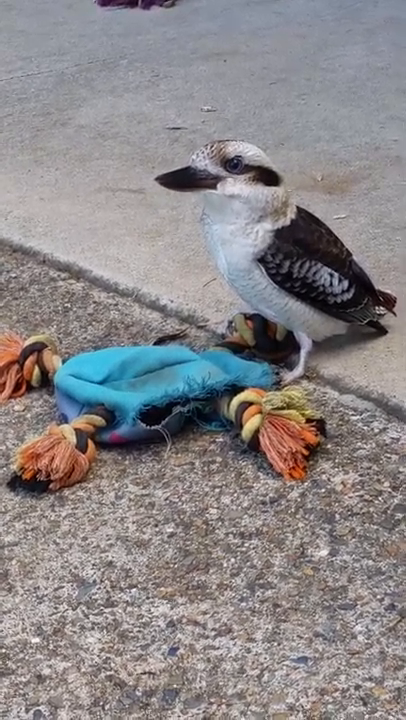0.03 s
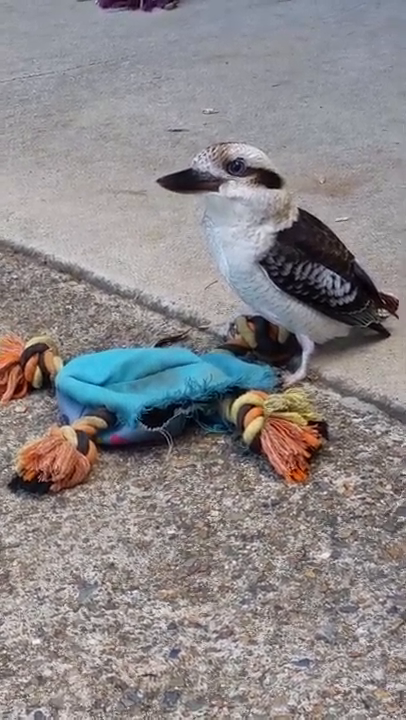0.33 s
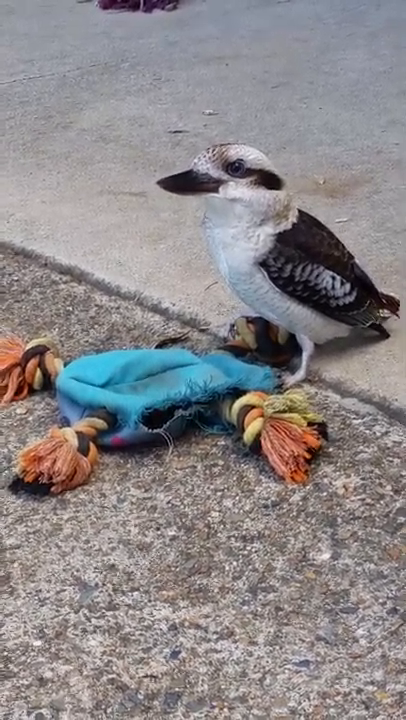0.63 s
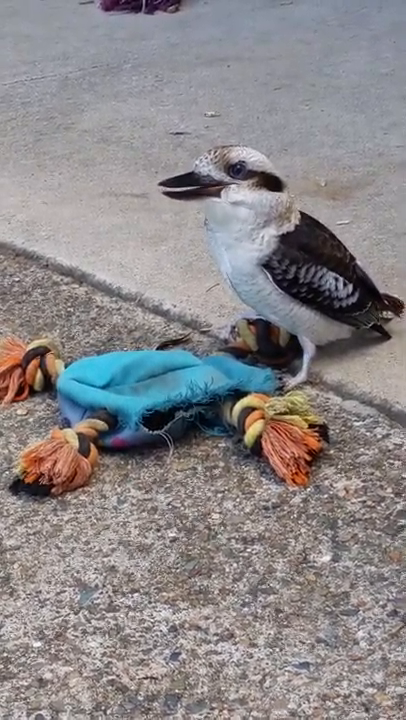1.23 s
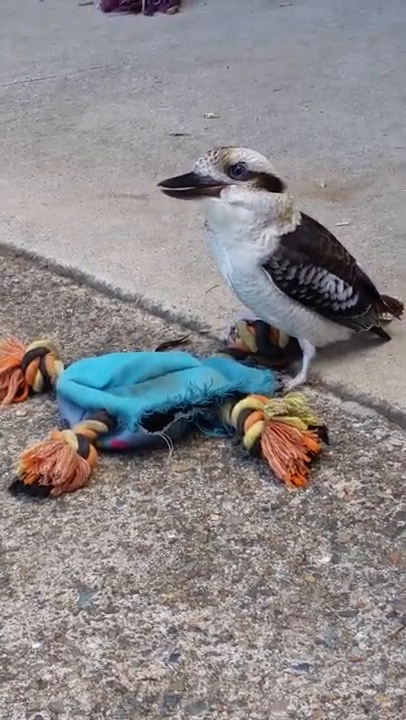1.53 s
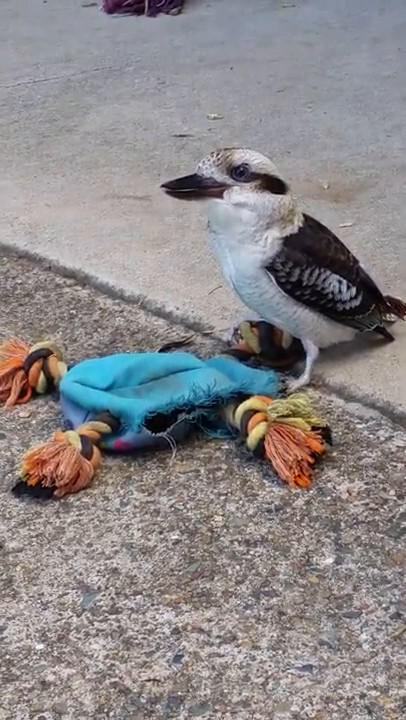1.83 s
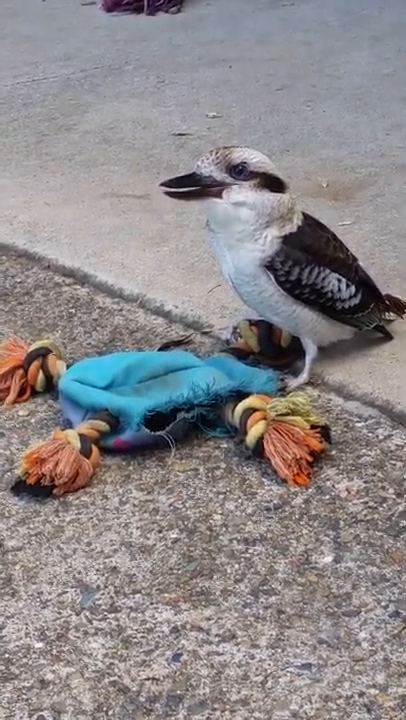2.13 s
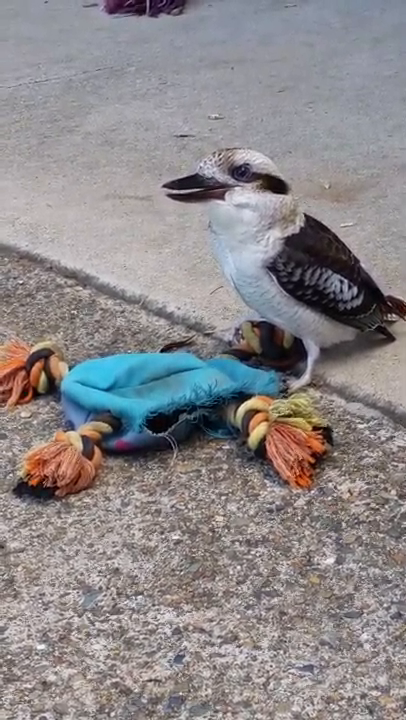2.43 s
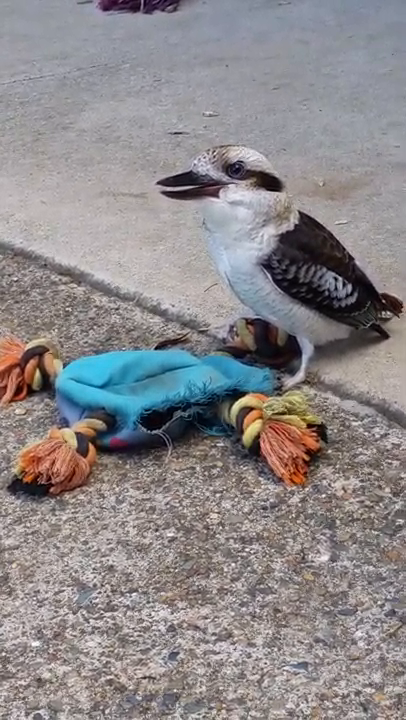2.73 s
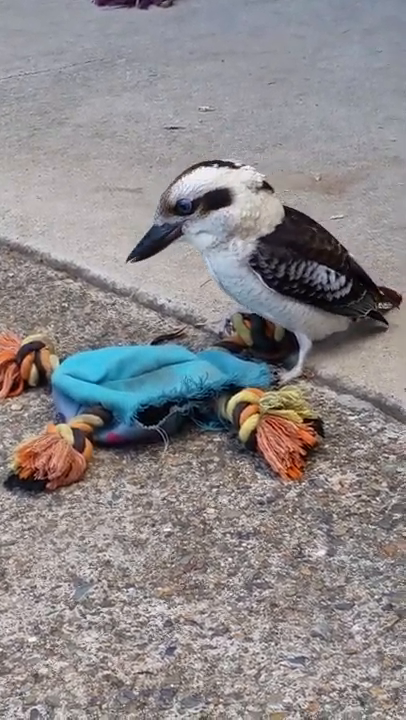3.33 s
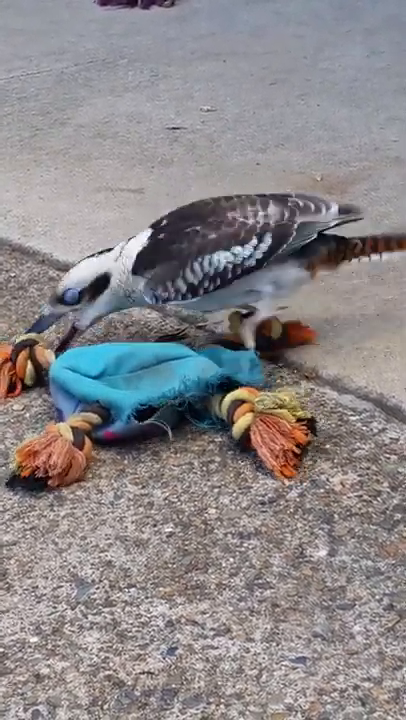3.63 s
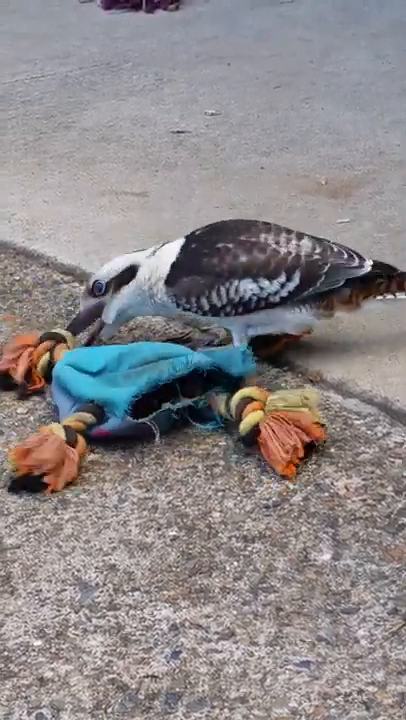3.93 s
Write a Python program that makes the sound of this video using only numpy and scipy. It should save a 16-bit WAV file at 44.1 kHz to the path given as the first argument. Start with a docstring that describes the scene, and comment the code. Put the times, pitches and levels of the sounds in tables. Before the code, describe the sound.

Close by on a concrete patio, a young bird begs in harsh, pulsing rasps after a hollow bump. It ends with a brief squawk and taps twice at a toy, over faint rumble and distant machine hum.

```python
"""A young kookaburra begs on a concrete patio, over rumble, hiss and a far machine hum.
A hollow bump and a rustle come first. A thin whine rises and at 1.2 s breaks into squeaks and dry,
rasping chatter; each rasp is a train of click bursts from the syrinx. Three more bumps sound near 2 s.
At 3 s comes a muffled rattle with the beak shut, then one short squawk.
Last, the bird taps twice as it lunges at a toy."""
import sys
import numpy as np
from scipy import signal
from scipy.fft import rfft, irfft
from scipy.io import wavfile
from scipy.ndimage import uniform_filter1d, map_coordinates

SR = 44100
rng = np.random.default_rng(int(sys.argv[2]) if len(sys.argv) > 2 else 0)


def int16_out(signal):
    """Quantize to a 16-bit WAV file."""
    q = np.round(np.clip(np.atleast_2d(signal).T, -1, 1) * 32767)
    wavfile.write(sys.argv[1], SR, q.astype(np.int16))


N = 176400
T = np.arange(N) / SR
BIN_HZ = np.fft.rfftfreq(N, 1 / SR)


def amp(db):
    """Decibels to gain."""
    return 10 ** (np.asarray(db) / 20)


def unit_rms(x):
    """Scales to rms 1."""
    return x / np.sqrt(np.mean(x ** 2) + 1e-20)


def lookup(points, hz):
    """Interpolates (frequency, value) points on a log-frequency axis."""
    point_hz, value = np.transpose(points)
    return np.interp(np.log(hz + 1), np.log(point_hz + 1), value)


def add(mix, start_s, sound):
    """Mixes a sound in at start_s."""
    part = mix[max(round(start_s * SR), 0):][:len(sound)]
    part += sound[:len(part)]


def noise(colour):
    """Steady noise with the given spectrum, rms 1."""
    return unit_rms(irfft(rfft(rng.standard_normal(N)) * amp(lookup(colour, BIN_HZ)), N))


def drift(corner_hz):
    """Low-passed random motion, rms 1."""
    return unit_rms(irfft(rfft(rng.standard_normal(N)) / (1 + (BIN_HZ / corner_hz) ** 2) ** 2, N))


def ring(colour, size=2048):
    """Minimum-phase impulse response of a spectrum, energy 1."""
    db = np.maximum(lookup(colour, abs(np.fft.fftfreq(size, 1 / SR))), -70)
    log_spectrum = np.conj(signal.hilbert(np.log(amp(db))))
    response = np.fft.ifft(np.exp(log_spectrum)).real[:size // 2]
    return response / np.linalg.norm(response)


def puff(decay_s, size=1024):
    """Decaying noise burst, energy 1."""
    burst = rng.standard_normal(size) * np.exp(-np.arange(size) / SR / decay_s)
    return burst / np.linalg.norm(burst)


def machine_hum():
    """Distant machine: low partials, each wavering in level and pitch."""
    # (frequency [Hz], rms level [dB])
    partials = [(72.7, -54.5), (121, -60), (145.6, -52.5), (217, -61.5), (291, -66), (436, -72.5)]
    drift_hz = 7.06
    out = np.zeros(N)
    for hz, db in partials:
        flutter = 1 + 0.1473 * drift(drift_hz)
        pitch_hz = hz * (1 + 0.01167 * drift(drift_hz))
        out += np.sqrt(2) * amp(db) * flutter * np.sin(2 * np.pi * np.cumsum(pitch_hz) / SR)
    return out


def background(right_share):
    """Swelling rumble, hum and hiss; right_share scales the right channel's colouring in dB."""
    # rumble spectrum (frequency [Hz], relative density [dB])
    rumble_colour = [(12, -78.5), (20, -23.5), (38, -6.5), (75, -3), (113, -3), (146, 2), (177, -8.5),
                     (290, -10.5), (340, -13.5), (430, -18.5), (2200, -39.5), (2860, -71.5), (4840, -120)]
    # hiss spectrum (frequency [Hz], relative density [dB])
    hiss_colour = [(900, -0.5), (2300, -28), (2700, -5.5), (3000, 3.5), (3400, -11), (4000, -9),
                   (4400, -3.5), (4800, -21.5), (5500, -20), (6600, -4.5), (7600, -19), (9000, -31),
                   (11000, -27.5), (12800, -11), (14500, -19.5), (15800, -16)]
    # slow swell (time [s], rumble and hum gain [dB], hiss gain [dB])
    swell = [(0, -6.5, -9), (.29, -5, -8.5), (.39, -2, -3), (.56, -7, -8.5), (.75, -4, -9.5),
             (1.45, -1.5, -1), (1.85, -2.5, -2.5), (2.05, 2.5, 0.5), (2.55, 0.5, 4), (3.0, -0.5, 1.5),
             (3.551, 3, 0.5), (3.78, 1, 0.5), (4, 0, -3)]
    # right channel colouring (frequency [Hz], gain [dB])
    right_colour = [(25, 0.5), (70, -12), (150, -18.5), (300, -11), (700, -8), (2000, -4.5), (3000, -8.5),
                    (7000, -11.5), (13000, -7)]
    time_s, low_db, hiss_db = np.transpose(swell)
    low = (machine_hum() + amp(-49.5) * noise(rumble_colour)) * amp(np.interp(T, time_s, low_db))
    hiss = amp(-61.5 + np.interp(T, time_s, hiss_db)) * noise(hiss_colour)
    return irfft(rfft(low + hiss) * amp(right_share * lookup(right_colour, BIN_HZ)), N)


def patio(sound):
    """Diffuse tail from the surrounding walls; the bass lasts longest."""
    # reverberation (frequency [Hz], T60 [s])
    decay = [(300, 0.9), (1200, 0.654), (3000, 0.1484), (8000, 0.344)]
    hz, t, spectra = signal.stft(rng.standard_normal(SR), SR, nperseg=256)
    fade = amp(-60 * t / lookup(decay, hz)[:, None])
    tail = signal.istft(spectra * fade, SR, nperseg=256)[1]
    return signal.fftconvolve(sound, tail / np.linalg.norm(tail))[:N]


def bumps():
    """Hollow bumps nearby, each one low note cut short; dull contacts start the first."""
    # hollow notes (start [s], rise [s], length [s], pitch [Hz], level [dB])
    notes = [(0.317, 0.0247, 0.0614, 236.7, -30), (1.977, 0.00324, 0.0225, 335.8, -35.5),
             (2.006, 0.0049, 0.0174, 336.4, -34), (2.041, 0.0149, 0.0145, 307.2, -36)]
    # contacts (time [s], level [dB])
    contacts = [(0.322, -33.5), (.336, -23.5)]
    # contact spectrum (frequency [Hz], relative gain [dB])
    contact_colour = [(100, -11.5), (380, 10), (600, -9), (1200, -24.5), (2000, -24.5), (4000, -41.5)]
    t60_s, release_s, octave_db = 0.193, 0.00436, -27.5
    out = np.zeros(N)
    for start_s, rise_s, length_s, hz, db in notes:
        t = np.arange(0, length_s + release_s / 2, 1 / SR)
        envelope = np.minimum(t / rise_s, amp(-60 * (t - rise_s) / t60_s))
        release = np.minimum((t[-1] - t) / release_s, 1)
        phase = 2 * np.pi * hz * t
        tone = np.sin(phase) + amp(octave_db) * np.sin(2 * phase)
        add(out, start_s, amp(db) * envelope * release * tone)
    for time_s, db in contacts:
        add(out, time_s, amp(db) * ring(contact_colour))
    return out


def rustles():
    """Soft rustles: brief arches of coloured noise."""
    # rustles (start [s], length [s], level [dB])
    events = [(0.319, 0.151, -60.5), (3.703, 0.139, -63)]
    # rustle spectrum (frequency [Hz], relative density [dB])
    colour = [(150, 0.5), (420, 14.5), (800, -7), (1150, -0.5), (1500, -27), (2000, -1.5), (3000, -11),
              (5000, -22), (6500, -2.5), (9000, -42.5)]
    out, rustle = np.zeros(N), noise(colour)
    for start_s, length_s, db in events:
        progress = np.clip((T - start_s) / length_s, 0, 1)
        out += amp(db) * rustle * np.sqrt(abs(np.sin(np.pi * progress)))
    return out


def taps():
    """Dry taps on the ground: an impact plus a short scuff."""
    # impacts (time [s], level [dB])
    hits = [(3.722, -27.5), (3.8432, -28.5)]
    # impact spectrum (frequency [Hz], relative gain [dB])
    colour = [(150, -16.5), (450, 10), (900, 3.5), (1400, -1), (2200, -19.5), (6000, -39.5)]
    out, impact = np.zeros(N), ring(colour)
    for time_s, db in hits:
        scuff = signal.fftconvolve(puff(decay_s=0.00357), impact)
        add(out, time_s, amp(db) * impact)
        add(out, time_s, amp(db + 1.5) * scuff)
    return out


def beak_tick(time_s=3.014, db=-44.5):
    """One thin, high tick of the beak."""
    # tick spectrum (frequency [Hz], relative gain [dB])
    colour = [(5000, -41), (9000, -24), (10500, -0.5), (12500, 1.5), (14000, -24.5)]
    out = np.zeros(N)
    add(out, time_s, amp(db) * signal.fftconvolve(puff(decay_s=0.0034), ring(colour)))
    return out


def whine():
    """Thin rising tone; its octave gains as it gets louder."""
    # whine contour (time [s], pitch [Hz], level [dB])
    contour = [(.73, 1497, -85.5), (.79, 1552, -76), (.85, 1600, -82), (0.884, 1868, -69.5),
               (0.979, 1937, -62), (1.08, 1970, -59.5), (1.138, 2089, -54.5), (1.175, 2137, -47.5),
               (1.195, 2071, -54.5), (1.21, 2060, -95)]
    time_s, hz, db = np.transpose(contour)
    pitch_hz = np.interp(T, time_s, hz) * (1 + 0.00505 * drift(corner_hz=90))
    phase = 2 * np.pi * np.cumsum(pitch_hz) / SR
    envelope = amp(np.interp(T, time_s, db)) * (T > time_s[0]) * (T < time_s[-1])
    octave = amp(-13) * envelope / envelope.max() * np.sin(2 * phase)
    return envelope * (np.sin(phase) + octave)


def squeaks():
    """Short rough tones that glide, mostly upward, and level off."""
    # squeaks (start [s], length [s], first pitch [Hz], last pitch [Hz], level [dB])
    glides = [(1.236, .014, 2200, 2350, -49), (1.40, .042, 3150, 3550, -54), (1.642, .01, 2200, 2100, -56),
              (1.652, .03, 1600, 1950, -59), (1.736, .037, 2100, 2830, -55), (1.811, .04, 2350, 3020, -49),
              (2.98, .029, 1500, 1950, -47)]
    roughness_hz = 400
    waver = 1 + 0.025 * drift(roughness_hz)
    flutter = 1 + 0.55 * drift(roughness_hz)
    out = np.zeros(N)
    for start_s, length_s, first_hz, last_hz, db in glides:
        progress = np.linspace(0, 1, round(length_s * SR))
        span = round(start_s * SR) + np.arange(len(progress))
        pitch_hz = (last_hz + (first_hz - last_hz) * (1 - progress) ** 2) * waver[span]
        envelope = amp(db) * np.sqrt(abs(np.sin(np.pi * progress))) * flutter[span]
        add(out, start_s, envelope * np.sin(2 * np.pi * np.cumsum(pitch_hz) / SR))
    return out


def swept(click, delay_s_per_hz=1.7e-7):
    """Makes a click a tiny upward sweep: treble arrives just after the low ring."""
    hz = np.fft.rfftfreq(len(click), 1 / SR)
    return irfft(rfft(click) * np.exp(-1j * np.pi * delay_s_per_hz * hz ** 2), len(click))


def syrinx_click(throat, tuning):
    """Air leak, pulse and puff ring the throat. Returns the click (energy 1) and its lead [s]."""
    retuned = map_coordinates(throat, [np.arange(len(throat)) * tuning], order=3)
    leak = amp(-8) * puff(decay_s=0.00094)[::-1]
    after_puff = amp(-8) * puff(decay_s=0.0017)
    click = signal.fftconvolve(retuned, np.concatenate([leak, [1], after_puff]))
    power = abs(uniform_filter1d(uniform_filter1d(click ** 2, size=16), size=16))
    click /= np.sqrt(1 + 1.3 * power / power.max())  # flatter peak, fuller click
    return click / np.linalg.norm(click), len(leak) / SR


def chatter():
    """Rasps, rattle and squawk: bursts of 1-4 syrinx clicks, the last accented, shaped by the beak."""
    # rasps (start [s], length [s], relative level [dB], first burst rate [Hz], last burst rate [Hz],
    # clicks per burst, beak posture)
    rasps = [(1.258, .006, -41, 80, 80, 1, "ajar"), (1.281, .006, -41, 80, 80, 1, "ajar"),
             (1.2989, .005, -37, 80, 80, 1, "ajar"), (1.3103, 0.0318, -36.5, 95.15, 117.7, 1, "ajar"),
             (1.351, 0.0097, -34.5, 154, 150, 1, "ajar"), (1.397, 0.0114, -37, 169.3, 171, 1, "ajar"),
             (1.418, 0.0144, -32, 104.8, 110.7, 1, "ajar"), (1.443, 0.0566, -33.5, 166.3, 228.9, 1, "ajar"),
             (1.67, 0.0226, -45.5, 89.4, 93, 1, "ajar"), (1.7398, .006, -40.5, 80, 80, 1, "ajar"),
             (1.817, 0.0061, -36, 79, 80.2, 1, "ajar"), (1.843, 0.0243, -36.5, 120.4, 130.2, 1, "ajar"),
             (1.909, 0.0077, -41.5, 80, 80, 2, "ajar"), (1.932, .006, -33.5, 80, 80, 1, "ajar"),
             (1.95, .018, -33, 80.26, 83, 2, "ajar"), (1.981, .027, -31, 95.7, 95.67, 2, "ajar"),
             (2.023, 0.03013, -30, 85.28, 106.1, 2, "ajar"), (2.067, .022, -32.5, 59.3, 60, 1, "ajar"),
             (2.087, 0.0361, -31, 109.3, 246.7, 1, "ajar"), (2.197, 0.0416, -27.5, 131, 113.8, 2, "wide"),
             (2.240, 0.0186, -32.5, 134, 132.4, 2, "wide"), (2.276, .006, -35, 110, 110, 2, "wide"),
             (2.284, .006, -33, 110, 110, 2, "wide"), (2.340, .041, -25.5, 125, 115.1, 3, "wide"),
             (2.392, 0.0239, -30.5, 115.6, 114, 2, "wide"), (2.431, 0.04565, -29, 104.3, 109.7, 2, "wide"),
             (2.488, 0.0078, -28.5, 80, 80, 3, "wide"), (2.518, .017, -27.5, 94.2, 95, 3, "wide"),
             (2.5388, .040, -26.5, 270, 310.2, 1, "wide"), (2.583, .006, -26.5, 80, 80, 3, "wide"),
             (2.597, 0.022, -30, 79.6, 79, 3, "wide"), (2.627, .040, -27.5, 129.8, 145.9, 2, "wide"),
             (2.7235, .030, -24.5, 82, 83.34, 4, "wide"), (2.7704, 0.006, -28, 80, 80, 3, "wide"),
             (2.793, 0.02556, -27, 110.6, 120.3, 2, "wide"), (2.823, 0.02303, -27, 130, 128.6, 2, "wide"),
             (2.846, 0.012, -31.5, 127.2, 128, 2, "wide"), (3.004, 0.00535, -33, 80.2, 79.29, 1, "shut"),
             (3.0582, 0.0769, -37, 81.94, 138.8, 1, "shut"),
             (3.143, 0.03104, -37.5, 190.5, 171.5, 1, "shut"),
             (3.188, 0.0171, -35.5, 89.51, 202, 1, "shut"),
             (3.349, 0.03026, -29.5, 135.3, 136.6, 2, "squawk"),
             (3.38, 0.02184, -32, 199.6, 152, 1, "squawk"), (3.408, 0.016, -34.5, 131.3, 111, 1, "squawk")]
    # throat and beak spectrum, per posture (frequency [Hz], relative gain [dB])
    beak_colours = {"ajar": [(350, -32.5), (600, -13.5), (854, -17.5), (1080, -11.5), (1320, -20),
                    (1820, -4.5), (2460, 4.5), (2710, -8), (3060, -0.5), (3720, -18), (4640, -8),
                    (5360, -43), (6600, -7.5), (7010, -21.5), (7730, -43.5), (11000, -52.5), (14300, -90),
                    (22000, -120)], "wide": [(290, -44), (500, -19.5), (594, -12.5), (947, -20.5),
                    (1080, -10.5), (1340, -17.5), (1890, -5), (2130, -2.5), (2400, 5), (2710, -4),
                    (3090, -4), (3770, -16), (4730, -13), (5400, -26), (5780, -24.5), (6680, -8),
                    (7140, -19.5), (7640, -52), (8610, -35), (9450, -63), (12000, -51), (15600, -67),
                    (22000, -120)], "shut": [(350, -47.5), (600, -4), (955, -6.5), (1240, -9.5),
                    (1880, -2.5), (2530, 4.5), (3510, -22), (5660, -32.5), (6700, -24), (9000, -55),
                    (11700, -89.5), (19800, -120)], "squawk": [(350, -39.5), (600, -7.5), (781, -6.5),
                    (852, -20.5), (1110, 3), (1480, -16), (2130, -9.5), (2410, 3.5), (3020, 7), (3430, -11),
                    (4130, -7), (5310, -32.5), (6740, -7), (8880, -59), (9700, -33), (12000, -53),
                    (15600, -74.5), (22000, -120)]}
    # click spacing in a burst, per posture (gap [s])
    click_gap_s = {"ajar": 0.0035, "wide": 0.0024, "shut": .0028, "squawk": .0034}
    bird_db, lead_in_db, spread_db = 11.5, -2.5, 1.2
    burst_jitter_s, gap_jitter, throat_wobble = 0.0003, 0.12, 0.02
    throats = {beak: swept(ring(colour)) for beak, colour in beak_colours.items()}
    out = np.zeros(N)
    for start_s, length_s, db, first_hz, last_hz, clicks, beak in rasps:
        elapsed_s = 0
        while elapsed_s < length_s:
            click_s = start_s + elapsed_s + burst_jitter_s * rng.standard_normal()
            for k in range(clicks):
                gap, strength, wobble = rng.standard_normal(3)
                click, lead_s = syrinx_click(throats[beak], tuning=1 + throat_wobble * np.tanh(wobble))
                click_db = bird_db + db + spread_db * strength + lead_in_db * (k < clicks - 1)
                add(out, click_s - lead_s, amp(click_db) * click)
                click_s += click_gap_s[beak] * (1 + gap_jitter * gap)
            elapsed_s += 1 / (first_hz + (last_hz - first_hz) * elapsed_s / length_s)
    return out


def scene():
    """Stereo mix: near sounds are strong on the left; on the right the bird is faint and smeared."""
    noises = chatter() + rustles() + taps() + beak_tick()
    tones = whine() + squeaks()
    thuds = bumps()
    direct = noises + tones
    to_walls = noises + amp(-6) * tones
    left = direct + thuds + amp(-6) * patio(to_walls) + background(right_share=0)
    smeared = signal.fftconvolve(direct, puff(decay_s=0.00107))[:N]
    right = amp(-27) * smeared + amp(-29.5) * thuds
    right += amp(-22.5) * patio(to_walls) + background(right_share=0.974)
    return np.array([left, right])


def record(dry):
    """Steep low-pass band limit."""
    cutoff_hz = 15800
    lowpass = signal.firwin(511, cutoff_hz, window=("kaiser", 9), fs=SR)
    return signal.oaconvolve(dry, lowpass[None], "same")


dry = scene()
out = record(dry)
int16_out(out)
```